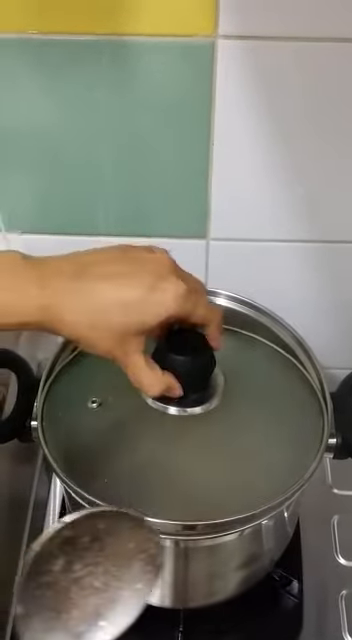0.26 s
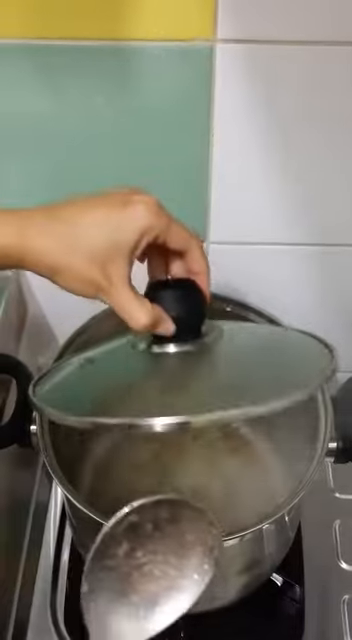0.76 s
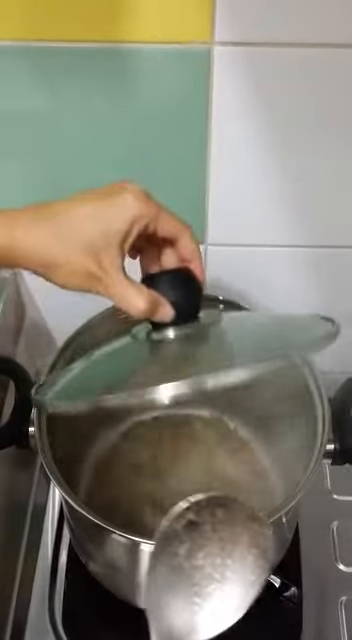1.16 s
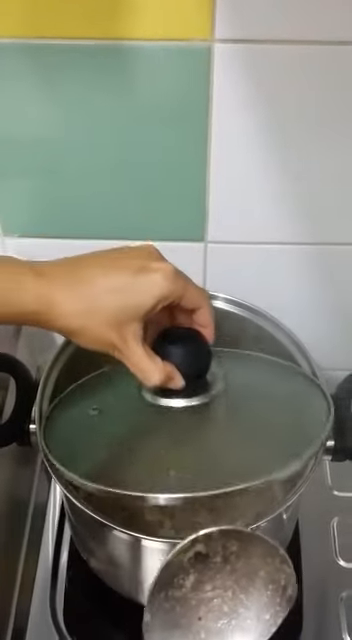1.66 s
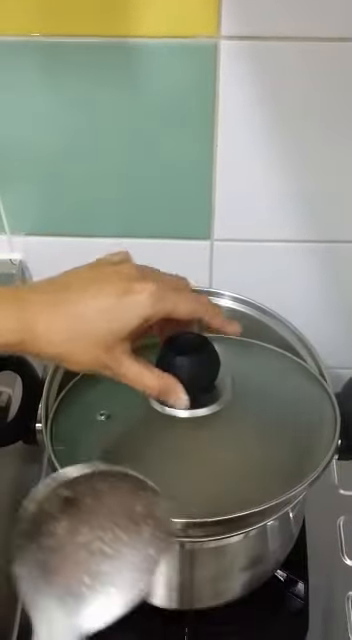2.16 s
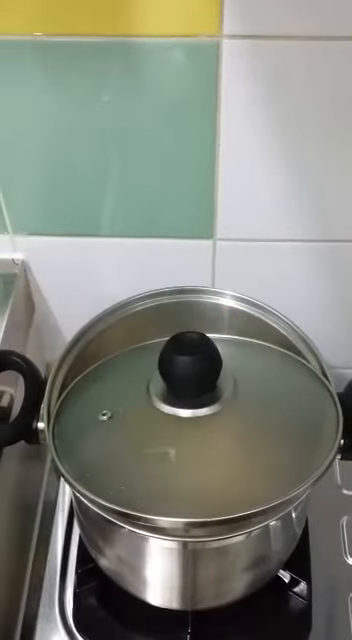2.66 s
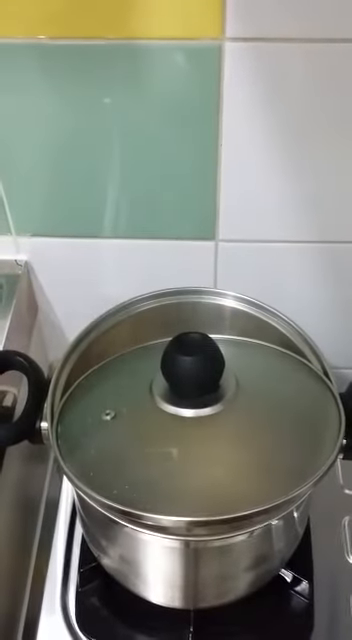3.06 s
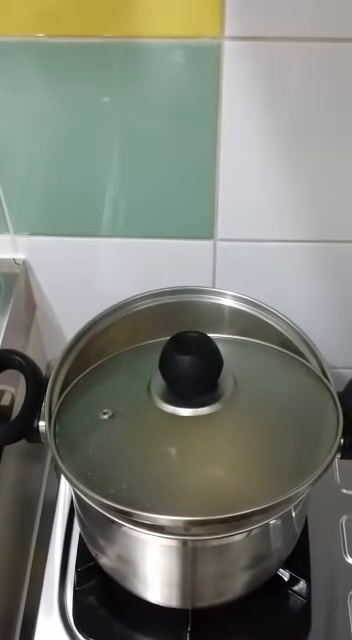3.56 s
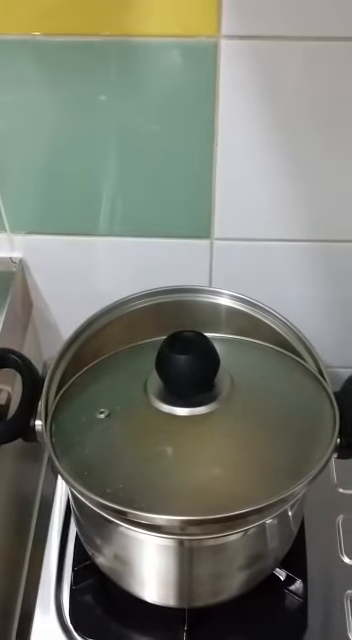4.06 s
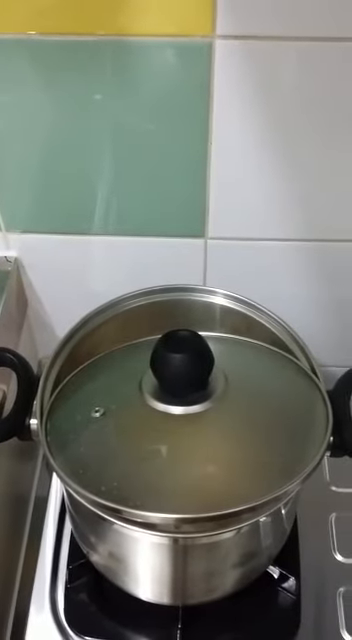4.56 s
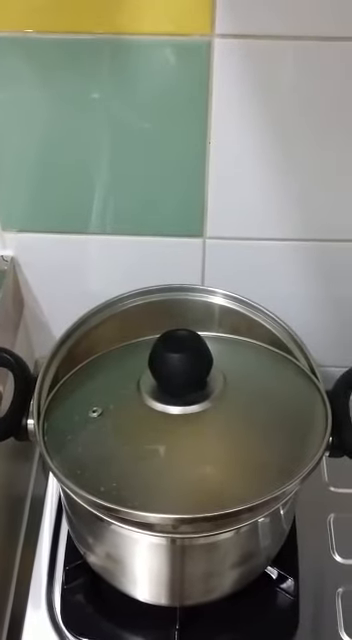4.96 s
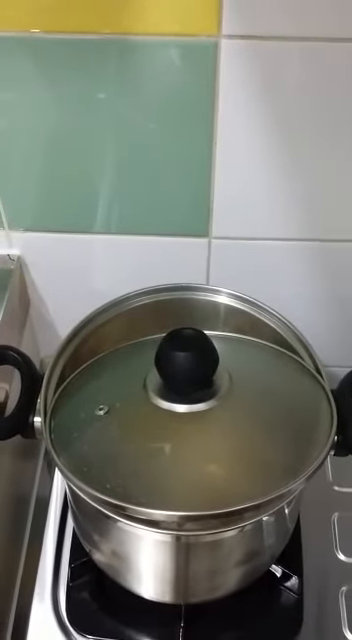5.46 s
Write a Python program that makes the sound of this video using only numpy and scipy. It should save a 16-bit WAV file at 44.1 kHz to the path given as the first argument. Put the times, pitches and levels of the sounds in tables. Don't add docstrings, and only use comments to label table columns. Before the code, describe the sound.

A dense, fizzy sizzle of paste frying in oil runs throughout, above a soft low gas flame roar. Early on the lid is lifted and the hiss changes colour slightly; it is set back with a few dull bumps and short scrapes. Later, sharp spits and a strong crackle pop out. Close phone microphone, stereo, small kitchen.

```python
import sys
import numpy as np
from scipy import signal
from scipy.io import wavfile
from scipy.ndimage import uniform_filter1d

SR = 44100
rng = np.random.default_rng(int(sys.argv[2]) if len(sys.argv) > 2 else 0)


def to_linear_factor(level_db):
    exponent = np.asarray(level_db, float) / 20
    return 10 ** exponent


def dump(signal):
    limited = np.clip(np.atleast_2d(signal).T, -1, 1)
    pcm = np.round(limited * 32767).astype(np.int16)
    wavfile.write(sys.argv[1], SR, pcm)


N = 251772
FRAME, HOP = 4096, 1024

LIFT_S, LIFT_TAKES_S, LOWER_S, LOWER_TAKES_S = 0.5, 0.3, 1.3, 0.51
SEAT_S, SEAT_TAKES_S = 1.35, 0.32

# (time [s], level [dB])
FRY = [(0.0, -22.5), (0.25, -22.5), (0.62, -21), (1.0, -23), (1.35, -24), (1.9, -22.5), (2.5, -21.5),
       (2.9, -22.5), (3.3, -22), (3.7, -23.5), (4.2, -23.5), (4.65, -23), (4.9, -24), (5.71, -24)]
# (frequency [Hz], density [dB per Hz])
HISS = [(150, -38), (450, -17.5), (560, -7), (1000, -6.5), (1200, -3.5), (1600, -3), (2000, 0), (3000, 1.5),
        (5000, 1.25), (7000, -0.42), (10000, 0.33), (14400, -0.3)]
# (frequency [Hz], width [Hz], level [dB])
POT_SHUT = [(961, 10, 12), (836, 55, 4), (1283, 82, 7), (1407, 107, 7.5), (1939, 35, 4), (2114, 45, 8),
            (2240, 79, -3), (2438, 30, 10), (3400, 130, -2), (4600, 83, 4), (5490, 420, -1)]
# (frequency [Hz], width [Hz], level [dB])
POT_OPEN = [(978, 47, 9.5), (1007, 60, -7.5), (1373, 186, 6), (1462, 34, 5.5), (1700, 36, -1.5),
            (2216, 62, 8.5), (2470, 100, -0.9), (2680, 180, 0.1), (2850, 120, -1), (4000, 390, 0.5)]
# (frequency [Hz], width [Hz], level [dB])
POT_RESTING = [(592, 200, -2.5), (826, 40, 9), (1452, 40, 9), (1800, 77, -1), (3660, 250, -2)]
# (frequency [Hz], width [Hz], level [dB])
POT_FRESH = [(710, 280, -1.23), (1057, 69, -2.5), (1620, 150, -1), (2384, 38, 6), (2770, 400, -0.5)]
# (frequency [Hz], width [Hz], level [dB])
POT_STEAMED = [(790, 55, -3), (1604, 160, 2.2), (1893, 18, 3.5), (2100, 25, 2.5), (2545, 40, 5),
               (2280, 120, -1.5)]


def sizzle():
    starts = (rng.random(N) < 70 / SR) * np.minimum(rng.exponential(1, N), 2.6)
    clumps = evened(signal.lfilter([1], [1, -np.exp(-1 / (0.01 * SR))], starts))
    flutter_db = 0.75 * clumps + 0.4 * wander(0.0026)
    burst_sizes_db = 1.1 * np.minimum(rng.exponential(1, (2, N)), 4)
    bursts = to_linear_factor(burst_sizes_db) * rng.standard_normal((2, N))
    hz, t, z = paired(evened(bursts * to_linear_factor(flutter_db)))

    ajar = 0.9 * (1 - ramp(t, SEAT_S, SEAT_TAKES_S))
    sag = 1 + 0.033 * (ramp(t, 0.4, 0.68) - 0.5)
    resting = 1 - ramp(t, LIFT_S - LIFT_TAKES_S / 2, LIFT_TAKES_S)
    fresh = ramp(t, SEAT_S, SEAT_TAKES_S) - ramp(t, 2.3, 0.81)
    steamed = ramp(t, 4, 0.8)
    pot_db = (1 - ajar) * bumps_db(POT_SHUT, hz) + ajar * bumps_db(POT_OPEN, hz * sag)
    pot_db += resting * bumps_db(POT_RESTING, hz)
    pot_db += fresh * bumps_db(POT_FRESH, hz)
    pot_db += steamed * bumps_db(POT_STEAMED, hz)

    top = 1 / (1 + (9800 / (hz + 1)) ** 12)
    body = 1 / (1 + (hz / 3000) ** 8)
    spray = 1 / (1 + ((hz - 5800) / 1900) ** 4)
    body_follows, spray_follows = 0.43, 1.1
    freed_db, fade_db_per_s = 1.5, 0.14
    fizz_db = freed_db * raised(t) - fade_db_per_s * t
    swell_db = top * (fizz_db - fizz_db.mean())
    swell_db += body * (body_follows - 1) * vigour_db(t)
    swell_db += spray * (spray_follows - 1) * vigour_db(t)

    patches = rng.standard_normal(z.shape[1:])
    patches = evened(uniform_filter1d(uniform_filter1d(patches, size=40, axis=0), size=2, axis=1))
    z *= to_linear_factor(read(HISS, hz) + pot_db + swell_db + 0.45 * patches + 4.5)
    return sound(z) * to_linear_factor(follow(FRY, np.arange(N) / SR))


# (time [s], peak [dB], left over right [dB], length [s], crack [0-1])
SPITS = [(0.325, -19, -2, 0.012, 0.2), (0.56, -13.5, -16, 0.013, 0.3), (0.945, -5.5, 3, 0.015, 0),
         (2.585, -10, -11, 0.022, 0), (2.85, -16, 4, 0.01, 0.2), (3.6825, -8.5, -8, 0.012, 0.15),
         (4.144, -4.5, -6, 0.0099, 0), (4.2193, -2, -3, 0.015, 0.2), (4.226, -15, -1, 0.0087, 0.05),
         (4.255, -3, 5, 0.015, 0.05), (5.571, -5, -7, 0.0081, 0.13)]
# (time [s], peak [dB])
CRACKS = [
    (4.2222, 1.5),
    (4.2583, -4),
]


def spits():
    t, envelope = np.arange(N) / SR, np.zeros((2, N))
    for s, db, pan_db, length, crack in SPITS:
        u = np.maximum(t - s, 0)
        burst = np.exp(-u / length) + 4 * crack * np.exp(-u / 0.0022)
        port_db = np.array([[pan_db / 2], [-0.5 - pan_db / 2]])
        envelope += to_linear_factor(db - 12.5 + port_db) * (t > s) * burst
    spray = envelope * rng.standard_normal((2, N))
    for s, db in CRACKS:
        snap = np.cos(2 * np.pi * 9500 * (t - s)) * np.exp(-((t - s) / 0.00007) ** 2)
        spray -= to_linear_factor(db + np.array([[0], [-10]])) * snap
    return signal.sosfilt(signal.butter(2, 3500, "high", fs=SR, output="sos"), spray)


# (frequency [Hz], density [dB per Hz])
SCRAPE_TONE = [(88, -43), (150, -24), (188, -6), (230, -12.5), (318, -5), (394, -10.5), (441, -9.5),
               (900, -10), (1450, -13), (1680, -11.5), (2200, -14.5), (2860, -41), (4840, -120)]
# (time [s], length [s], level [dB])
STROKES = [
    (1.368, 0.087, -25.5),
    (1.454, 0.11, -29.5),
    (1.554, .07, -27.5),
    (1.617, 0.087, -30),
    (1.816, 0.14, -39),
]
# (time [s], peak [dB], ring [Hz], decay time t60 [s])
BUMPS = [
    (1.374, -15.5, 448, 0.09),
    (1.396, -18, 370, 0.076),
    (1.436, -19.5, 321, 0.42),
    (1.510, -25, 325, 0.07),
    (1.563, -12, 392, 0.14),
    (1.609, -19.5, 382, 0.14),
    (1.827, -25, 286, 0.22),
    (1.887, -22.5, 331, 0.26),
]
# (time [s], peak [dB], ring [Hz], decay time t60 [s])
PINGS = [
    (3.043, -21, 4560, 0.045),
    (4.741, -13, 4600, 0.08),
]


def lid_on_rim():
    t = np.arange(N) / SR
    catches = (rng.random(N) < 90 / SR) * rng.exponential(1, N)
    slips = 1.8 + evened(signal.lfilter([1], [1, -np.exp(-1 / (0.008 * SR))], catches))
    hz, _, z = paired(rng.standard_normal((2, N)) * slips)
    drag = sound(z * to_linear_factor(read(SCRAPE_TONE, hz) - 40 * (hz > 2600)))
    grip_s, slacken_db_per_s, let_go_s = 0.013, 26, 0.014
    push = np.zeros(N)
    for s, length, db in STROKES:
        held = ramp(t, s, grip_s) * (1 - ramp(t, s + length, let_go_s))
        push += held * to_linear_factor(db - slacken_db_per_s * abs(t - s))
    out = evened(drag) * push
    for s, db, ring_hz, t60 in BUMPS + PINGS:
        u = np.maximum(t - s, 0)
        ring = np.sin(2 * np.pi * ring_hz * u) * np.minimum(u / 0.0018, 1)
        out += to_linear_factor(db - 7.5 - 60 * u / t60) * ring
    return out


# (frequency [Hz], density [dB per Hz])
ROAR = [(25, -27), (50, -18), (65, -14.5), (88, 2), (118, -2), (135, -11), (170, -14), (200, -9.5),
        (270, -12.5), (325, -6.5), (355, -11.5), (392, -9.5), (450, -12), (520, -21.5)]
# (frequency [Hz], width [Hz], level [dB])
UNDER_LID = [(455.4, 60, 6.5), (324, 53, -5), (222, 85, -1)]


def burner():
    hz, t, z = paired(rng.standard_normal((2, N)) * to_linear_factor(0.36 * wander(0.04)))
    lid = raised(t) - 0.57 * (1 - ramp(t, LIFT_S, LIFT_TAKES_S))
    tone_db = read(ROAR, hz) + lid * bumps_db(UNDER_LID, hz)
    fade_db = 0.2 * t * (hz > 140)
    roar = evened(sound(z * to_linear_factor(tone_db - fade_db - 45 * (hz > 700))))
    t = np.arange(N) / SR
    level_db, shaded_db, lumps_db = -33, -2, 0.6
    return roar * to_linear_factor(level_db + shaded_db * raised(t) + lumps_db * wander(0.15))


def ramp(t, start, takes):
    return np.clip((t - start) / takes, 0, 1)


def raised(t):
    return ramp(t, LIFT_S, LIFT_TAKES_S) - ramp(t, LOWER_S, LOWER_TAKES_S)


def vigour_db(t):
    return follow(FRY, t) - np.mean(follow(FRY, t))


def evened(x):
    return x / np.sqrt(np.mean(abs(x) ** 2) + 1e-20)


def read(points, hz, column=1):
    table = np.transpose(points)
    return np.interp(np.log(hz + 1), np.log(table[0] + 1), table[column])


def follow(rows, t, column=1):
    table = np.transpose(rows)
    return np.interp(t, table[0], table[column])


def bumps_db(modes, hz):
    return sum(db / (1 + (2 * (hz - f) / width) ** 2) for f, width, db in modes)


def wander(span_s, size=N):
    span = max(int(span_s * SR), 2)
    return evened(uniform_filter1d(uniform_filter1d(rng.standard_normal(size), span), span))


# (frequency [Hz], likeness [0-1], lead of the right port [rad])
PAIR = [(30, .55, 0), (70, .97, 0), (160, .88, 0), (330, .77, 0), (600, .68, -.2), (1000, .4, -.6),
        (1300, .35, -3), (1900, .55, -5.2), (2400, .6, -6.9), (3000, .2, -6.4), (5500, .38, -9),
        (6200, .05, -8.4), (7700, .27, -7.4), (8700, .28, -7.8), (9500, .16, -9.5), (14000, .08, -9.4)]


def paired(drive):
    hz, t, z = signal.stft(drive, SR, nperseg=FRAME, noverlap=FRAME - HOP)
    like = read(PAIR, hz)[:, None]
    lead = np.exp(1j * read(PAIR, hz, column=2))[:, None]
    right = like * lead * z[0] + np.sqrt(1 - like ** 2) * z[1]
    return hz[:, None], t, np.array([z[0], right])


def sound(z):
    return signal.istft(z, SR, nperseg=FRAME, noverlap=FRAME - HOP)[1][:, :N]


def scene():
    return sizzle() + spits() + lid_on_rim() + burner()


HUSH_S = 0.0099
# (frequency [Hz], level [dB])
COARSE = [(100, -12), (330, -4), (480, 1.4), (800, 1.2), (1100, .8), (1600, 1.5), (3500, 6.6), (4600, 3.8),
          (5500, 3.8), (7500, -.5), (9000, -5), (14000, -5)]


def coarse_rounding(x, size=1024, order=704):
    grid = 16
    n, k = np.arange(2 * size) + 0.5, np.arange(order) + 0.5
    line_hz = k * SR / (2 * size)
    window = np.sin(np.pi * n / (2 * size))
    basis = window * np.cos(np.pi / size * np.outer(k, n + size / 2)) * np.sqrt(2 / size)
    count = N // size + 2
    padded = np.pad(x, ((0, 0), (size - grid, count * size - N + grid))).reshape(2, -1, size)
    lines = np.concatenate([padded[:, :-1], padded[:, 1:]], axis=2) @ basis.T

    groups = rng.standard_normal((count, order // 4))
    jumps = 0.35 * rng.standard_normal((count, 1)) + np.repeat(groups, 4, axis=1)
    loud = np.sqrt(np.sum(lines ** 2, axis=2, keepdims=True) / size) + 1e-9
    block_s = np.arange(count) * size / SR
    thrift_db = 0.4 + 0.4 * vigour_db(block_s)[:, None]
    near_crack = abs(block_s + grid / SR - CRACKS[0][0] - HUSH_S) < 0.024
    thrift_db = thrift_db + 3 * np.outer(near_crack, line_hz < 1200)
    step = loud * to_linear_factor(read(COARSE, line_hz) + thrift_db + 1.3 * jumps)

    blocks = (np.sign(lines) * np.floor(abs(lines) / step + 0.4) * step) @ basis
    joined = np.pad(blocks[..., :size], ((0, 0), (0, 1), (0, 0)))
    joined += np.pad(blocks[..., size:], ((0, 0), (1, 0), (0, 0)))
    return joined.reshape(2, -1)[:, size - grid:size - grid + N]


def roll_off(x):
    return signal.sosfilt(signal.butter(12, 15100, fs=SR, output="sos"), x)


LEFT_PORT = -3.5, [(6910, 2000, 10.5), (5300, 900, 2.5), (59.4, 270, 1.04), (1274, 900, -1.32),
             (592, 300, 1.5)]
RIGHT_PORT = -0.03, [(8786, 1260, 8.5), (8810, 170, 1.5), (10070, 6000, 3), (6940, 1200, -2.5)]


def record(dry):
    hz, t, z = signal.stft(dry, SR, nperseg=FRAME, noverlap=FRAME - HOP)
    port_db = [db + bumps_db(modes, hz) for db, modes in (LEFT_PORT, RIGHT_PORT)]
    z = z * to_linear_factor(port_db)[:, :, None]
    ahead = CRACKS[0][0] - np.arange(N) / SR
    hush_db = -3 * (ahead > 0.0005) * ramp(-ahead, -2 * HUSH_S, HUSH_S)
    heard = sound(z) * to_linear_factor(hush_db)
    heard = coarse_rounding(heard / (1 + (heard / 1.4) ** 4) ** (1 / 4))
    band_limit = signal.firwin(901, 14490, window=("kaiser", 8), fs=SR)
    mix = signal.oaconvolve(heard, band_limit[None], "same", axes=1)
    return roll_off(mix)


dry = scene()
out = record(dry)
dump(out)
```